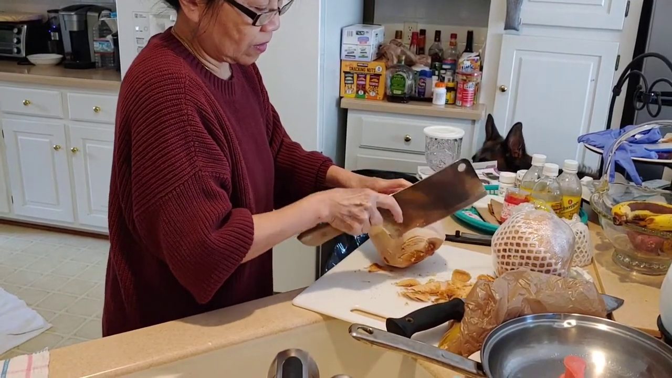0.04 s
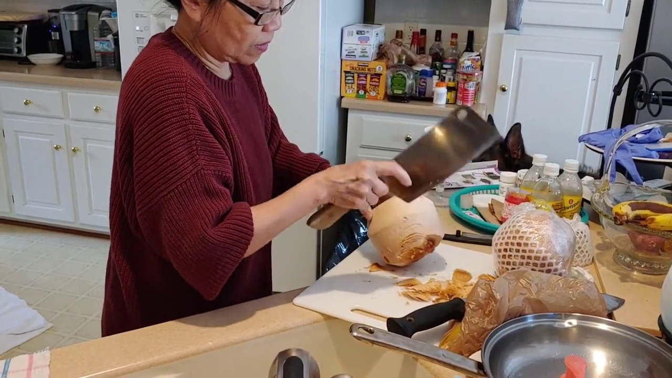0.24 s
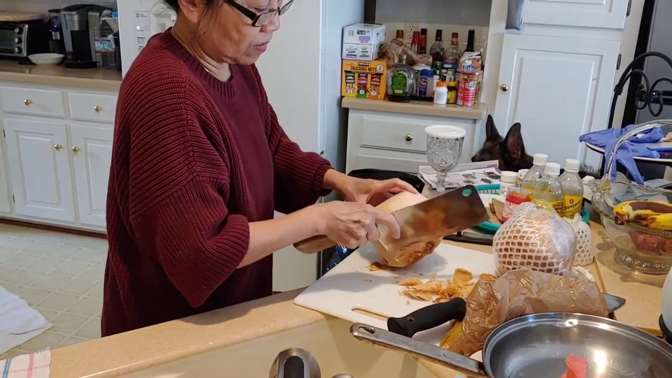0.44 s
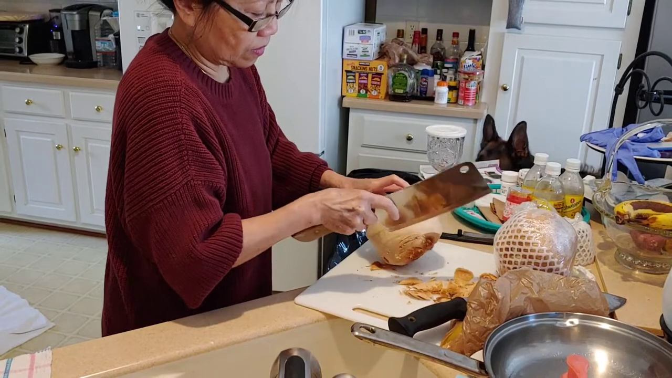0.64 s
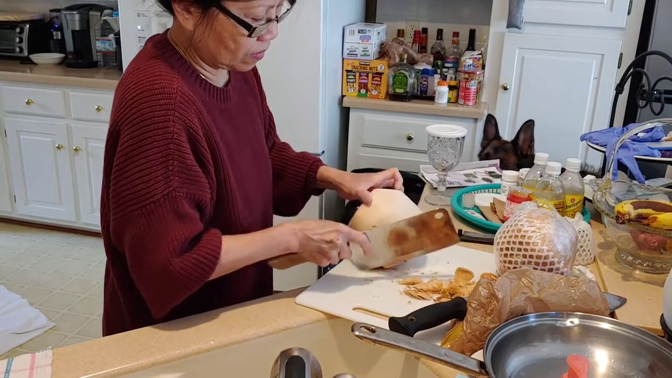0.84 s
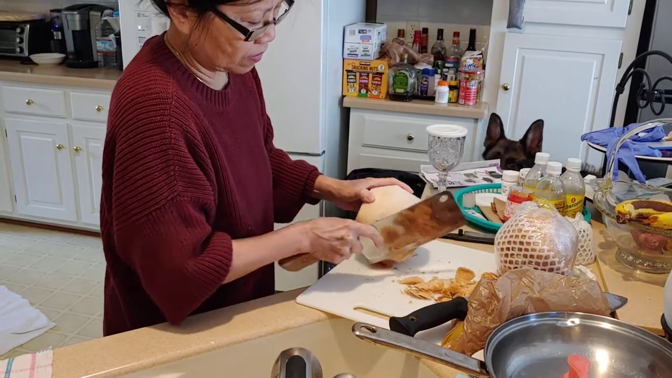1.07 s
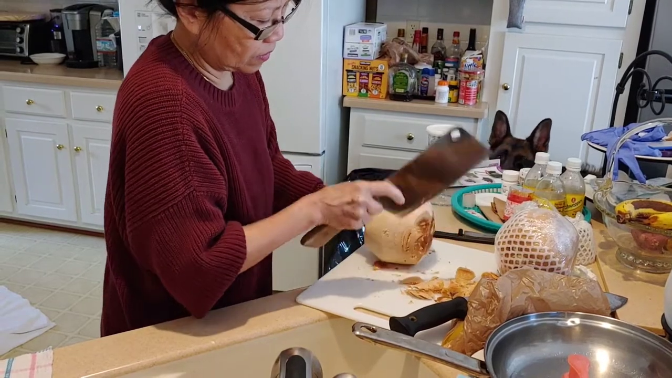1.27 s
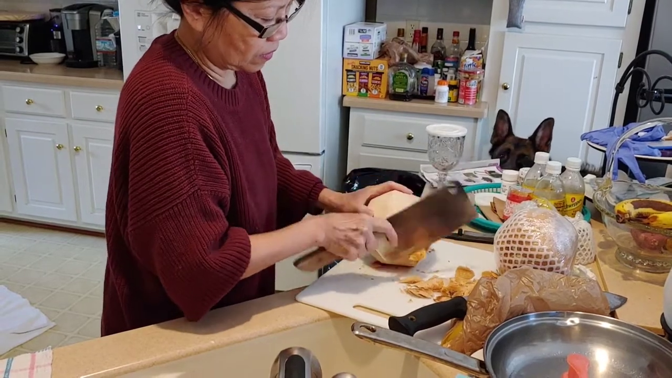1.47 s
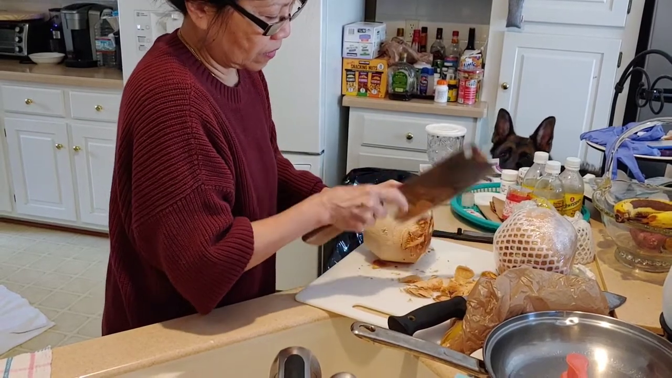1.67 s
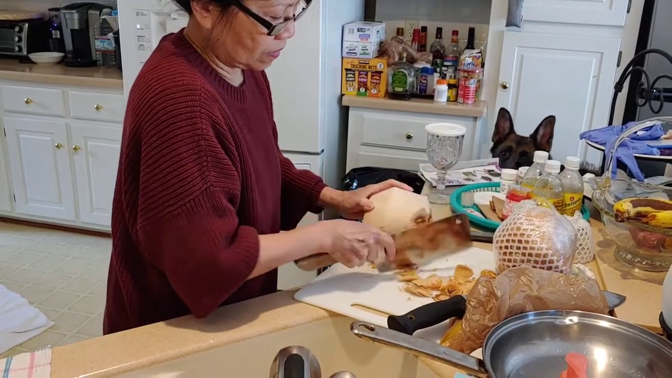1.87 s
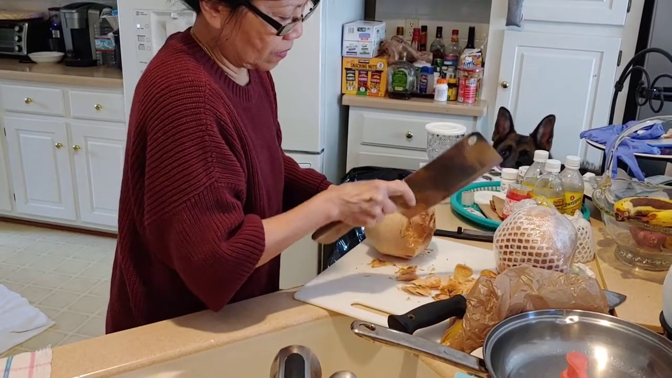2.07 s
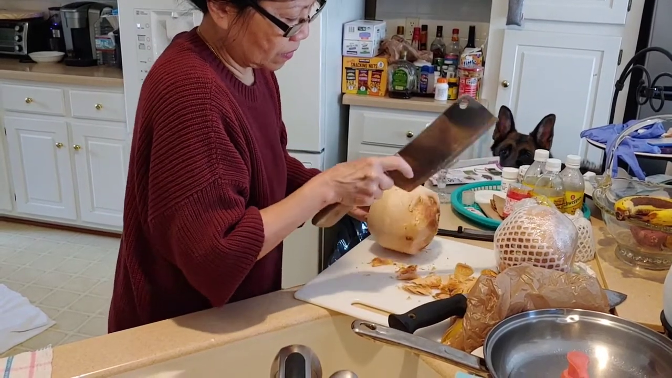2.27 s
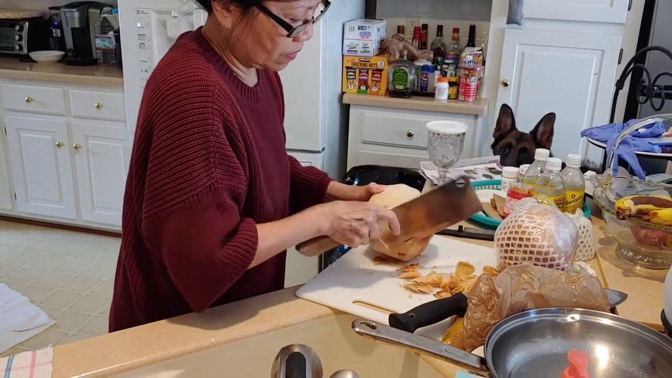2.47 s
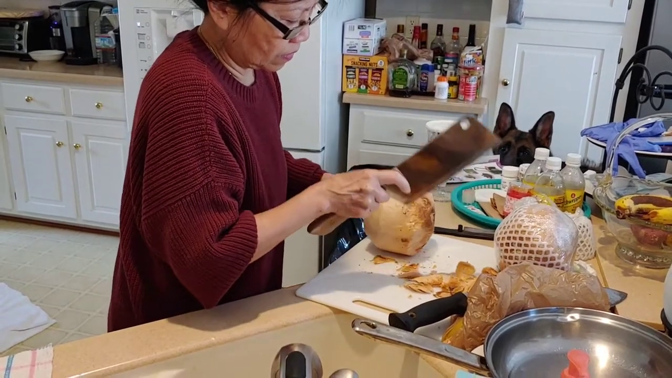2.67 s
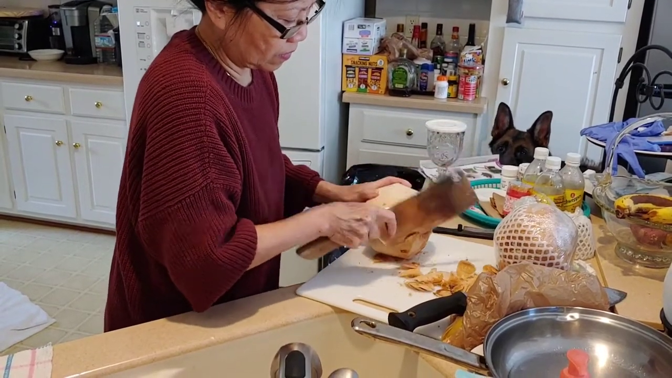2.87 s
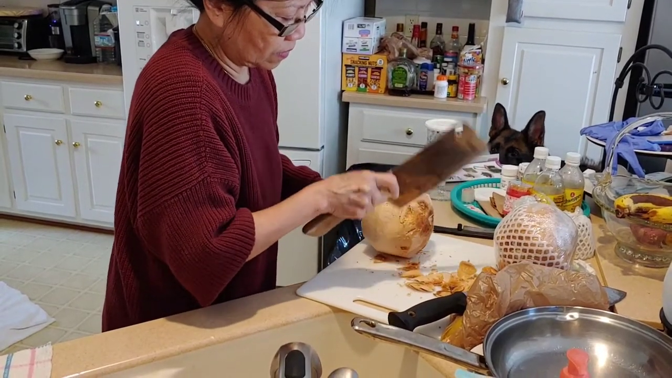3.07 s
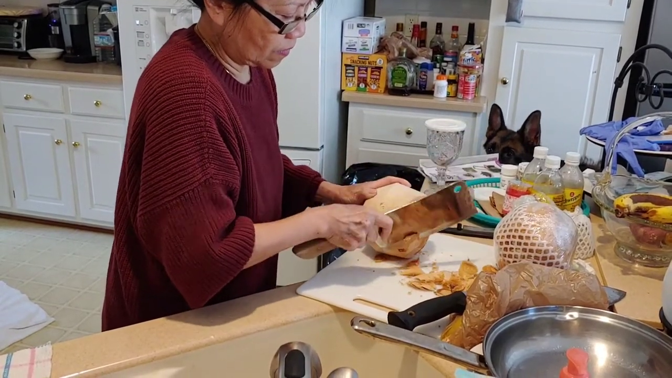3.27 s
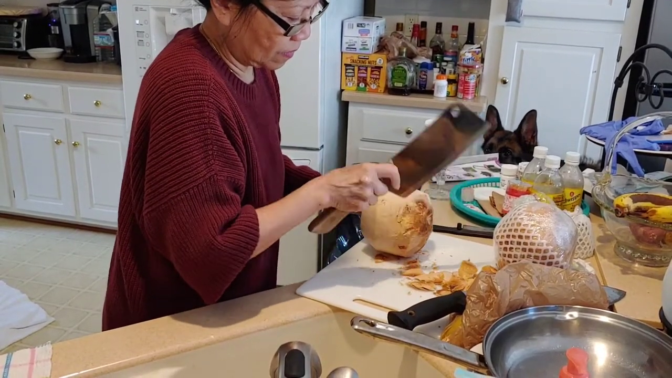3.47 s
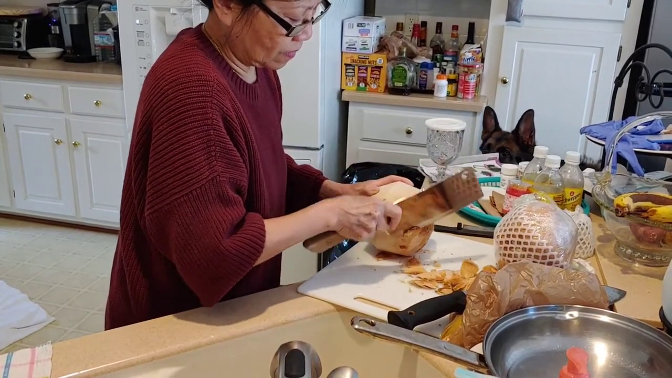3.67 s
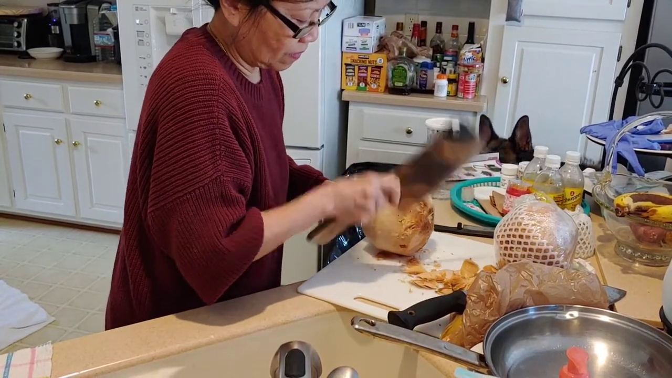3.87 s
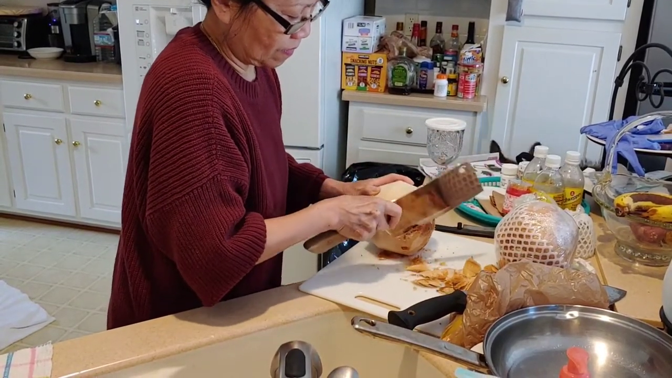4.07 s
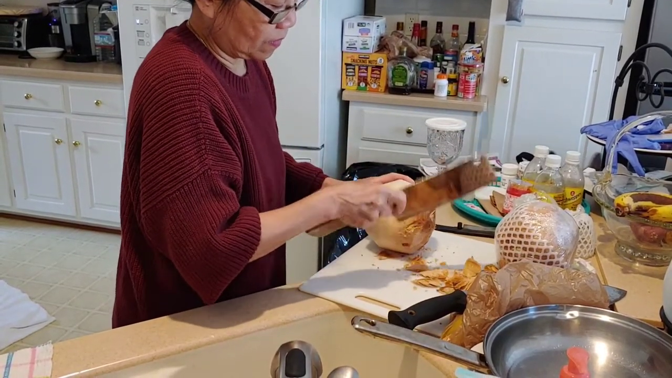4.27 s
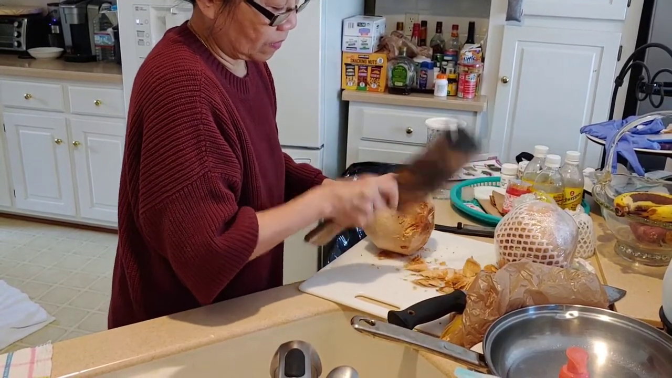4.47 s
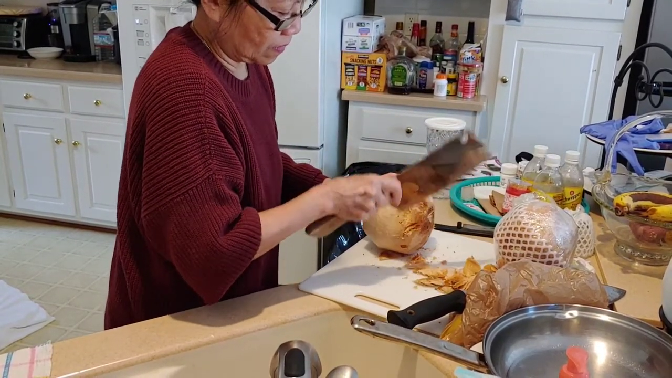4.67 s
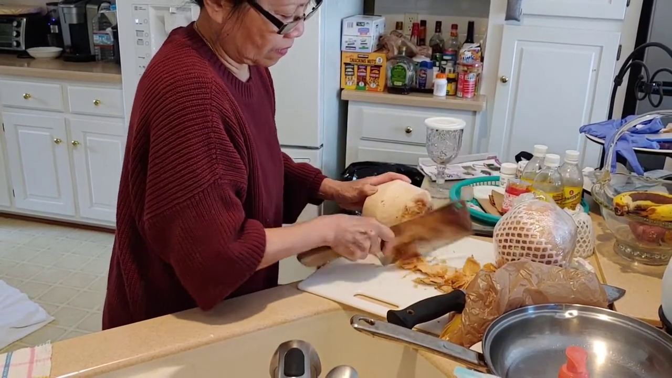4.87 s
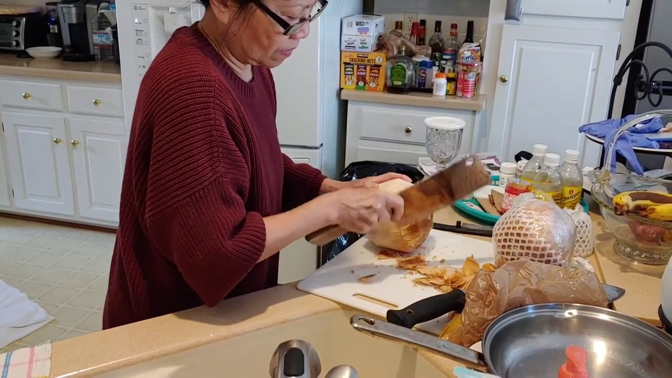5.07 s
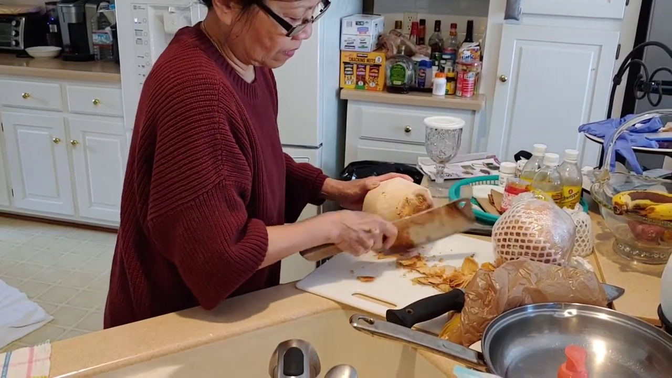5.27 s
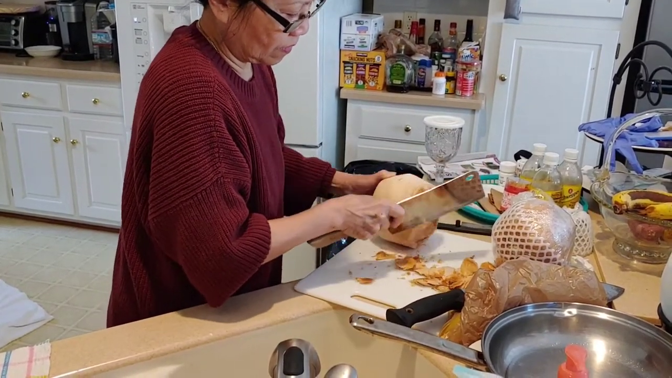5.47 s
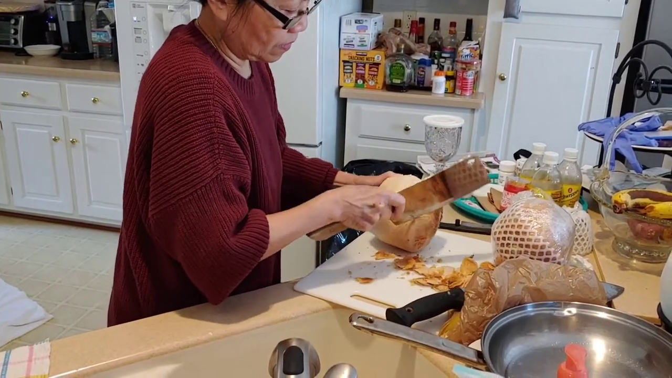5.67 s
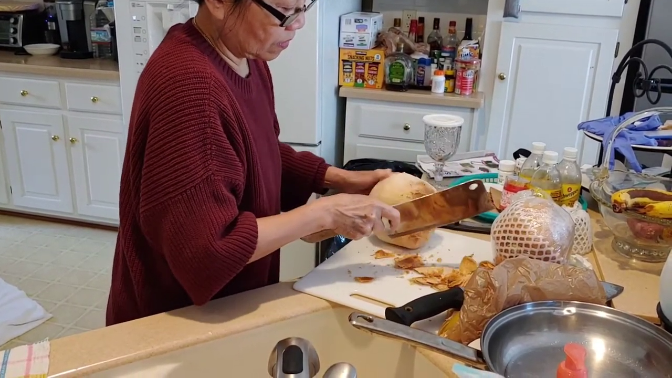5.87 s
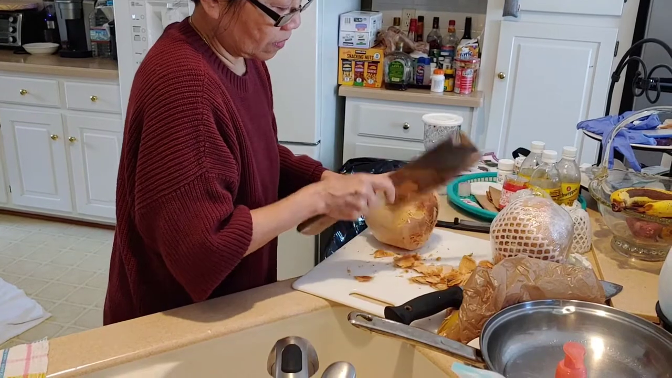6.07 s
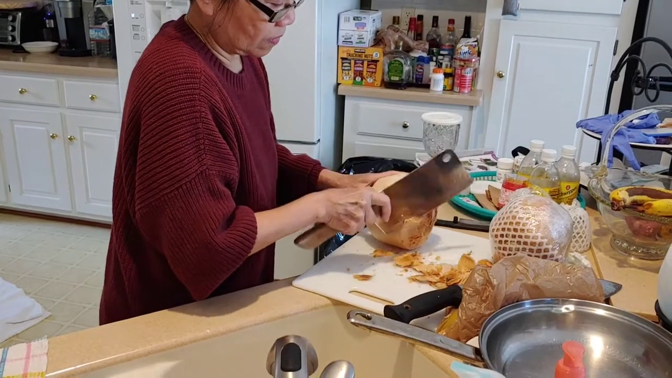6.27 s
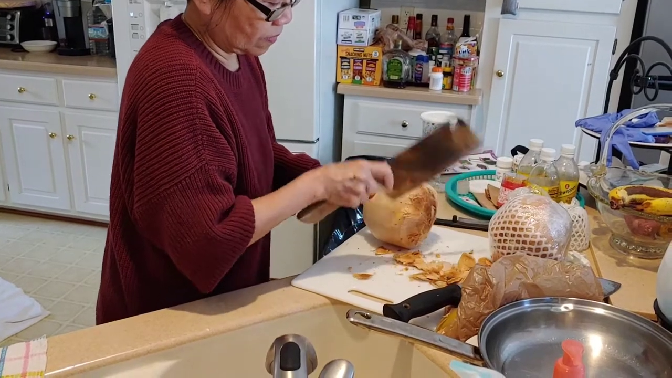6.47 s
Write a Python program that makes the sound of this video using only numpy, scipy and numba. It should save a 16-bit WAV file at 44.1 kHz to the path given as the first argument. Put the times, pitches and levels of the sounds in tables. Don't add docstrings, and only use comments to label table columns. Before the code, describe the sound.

A heavy cleaver hacks at a fibrous coconut on a board, crunching and knocking, with hollow rings and a low fridge hum.

```python
import sys
import numpy as np
from scipy import signal
from scipy.fft import rfft, irfft
from scipy.io import wavfile
from scipy.ndimage import uniform_filter1d
from numba import njit

SR = 44100
rng = np.random.default_rng(int(sys.argv[2]) if len(sys.argv) > 2 else 0)


def natural_amplitude(level_db):
    exponent = np.asarray(level_db, float) / 20
    return 10 ** exponent


def to_wav(s):
    ch = np.atleast_2d(s).T
    pcm = np.round(np.clip(ch, -1, 1) * 32767)
    wavfile.write(sys.argv[1], SR, pcm.astype(np.int16))


N = 287948
LEAD = SR // 10
LENGTH = N + LEAD
BANDS_HZ = 28 * 2 ** np.arange(0, 9.1, .5)

# start in seconds, force in dB, edge in dB (how much the blade bites),
# weight in dB (how much the board takes), depth in dB (how much of that reaches the counter).
CUTS = [(.435, -34, -1, 6, 4.5), (1.476, -30.5, -2, 4.5, -10.5), (1.882, -27, -3.44, 2, -5),
        (2.484, -42.5, 1.5, 7, -12.5), (2.886, -30, -3.5, 1.5, 2), (3.275, -28.5, -2.04, 4.5, 3),
        (3.621, -28, -2.5, 9, -8.5), (3.959, -17.5, -11, 6.5, -10.5), (4.883, -43.5, 11, 24.5, -7.5),
        (5.270, -41, 6.5, 12.5, -8), (6.317, -27.5, 0.66, 3.5, 3.2), (1.279, -49, -2, 35, -10)]
STOPS = [(-.017, -19, 0, 2.5, -1.5), (0.447, -25.5, -11, 3, -11.5), (1.2868, -16, 5, -4.5, -13),
         (1.487, -37.5, -4.5, -6, -11), (1.926, -9, 1.5, -3, -19.5), (2.495, -32.5, -9.5, 4.5, -5),
         (2.898, -31, -20.5, 13, -8), (3.290, -24, -9.5, 4, -7.5), (3.637, -25.5, -8, 4, 0.5),
         (3.965, -14.5, -7.5, 4.5, -14.5), (4.566, -11, -5, 3.5, -12), (4.896, -21.5, 5.5, -8, -11),
         (4.930, -9, -2, -2, -11), (5.296, -6.5, -0.3, -5.5, -6.5), (6.369, -27, 2, 6, -6)]
BOUNCES = [
    (.487, -43, -2.5, 9, -9),
    (1.329, -31, 0.5, 9, -3.5),
    (1.534, -46.5, -18.5, -10, -7.5),
    (2.555, -41.5, -16, 5, 4.5),
    (2.944, -36, -14.5, -7, 16.5),
    (3.316, -38, 8.5, -2, -6),
    (4.011, -45.5, -10, 31.5, -3.2),
    (6.42, -52.5, -8, 25, -22),
]
# start in seconds, force in dB, edge in dB, contact length in ms.
TOUCHES = [(.713, -49, 5.5, 15.3), (.932, -55, -1.8, 13.6), (0.959, -54, -22, 10.6), (1.07, -72, 0, 13),
           (4.24, -45, -12, 12), (4.8, -45.5, -11.5, 16), (5.605, -58, 5.5, 21), (5.74, -59, -2.5, 16),
           (5.87, -55.5, -4, 23.5), (6.028, -50.5, -0.3, 12.7), (6.507, -70.5, 18, 17)]


def contacts():
    contact_ms, sharper_per_edge_db = (8, 3.2, 2.2), (-.02, .022, 0.036)
    push_ms, thud_lag_ms = (3.87, 3.08, 4), (1.52, -0.14, -3.5)
    air, ground = [], []
    for kind, table in enumerate((CUTS, STOPS, BOUNCES)):
        for s, force_db, edge_db, weight_db, depth_db in table:
            shorter = .008 * (force_db + 20) + sharper_per_edge_db[kind] * edge_db
            air.append((s, *airborne(kind, force_db, edge_db), contact_ms[kind] * np.exp(-shorter)))
            board_db = force_db + weight_db
            longer = np.exp(0.022 * (board_db + 19))
            thud_s = s + thud_lag_ms[kind] / 1000
            ground.append((thud_s, board_db, board_db + depth_db, push_ms[kind] * longer))
    for s, force_db, edge_db, ms in TOUCHES:
        air.append((s, *airborne(-1, force_db, edge_db), ms))
    return air, ground


def airborne(kind, force_db, edge_db):
    crunch_db, crunch_per_edge = (1.6, 3.5, 3, 8.3), (0.43, .45, .15, 1.1)
    splinter_db, splinter_per_edge = (-13, -18.5, -13, -18), (1.4, 0.38, 1, 0.52)
    crunch = force_db + crunch_db[kind] + crunch_per_edge[kind] * edge_db
    splinters = force_db + splinter_db[kind] + splinter_per_edge[kind] * edge_db
    return crunch, force_db, force_db + edge_db, splinters


# mode frequency in Hz, level in dB, 60 dB decay time in seconds.
SHELL = [(436, 1, 0.03), (561, -6, 0.052), (623, -0.5, .04), (741, -3.5, 0.083), (868, -2, 0.041),
         (994, -3, 0.079), (1104, -4, 0.075), (1240, -7, 0.012), (1340, -10, 0.07), (1472, -5.5, 0.13)]
HUSK = [(1764, -3, 0.016), (1895, -3.5, 0.017), (2037, -2.5, 0.013), (2470, -9, 0.0077), (2780, -6, 0.0076),
        (3340, -2.5, 0.0029), (3616, -4.5, 0.0091)]
BLADE = [(3830, 0.5, 0.0041), (4955, 2, 0.0051), (5540, -3.5, 0.022), (6535, 6, 0.0053), (6850, -5, 0.0022)]
SPLINTERS = [(8600, -2.5, 0.0046), (9900, -6, 0.00085), (10650, -8, 0.0062)]


def chops():
    direct, spread = np.zeros((2, LENGTH + SR))
    for s, crunch_db, knock_db, blade_db, splinter_db, contact_ms in contacts()[0]:
        knock = strike(SHELL, tearing(0.29 * contact_ms, 3.1), knock_db - 4.5)
        crunch = strike(HUSK, tearing(contact_ms, 2.2), crunch_db - 7.5)
        fizz = strike(BLADE, tearing(contact_ms, 5.6), blade_db - 6)
        fizz = fizz + strike(SPLINTERS, tearing(.6 * contact_ms, 1.6), splinter_db)
        place(direct, s, (knock + crunch + fizz)[0])
        beamed = min(contact_ms / 6, 1)
        into_room = radiated((knock + beamed ** .4 * crunch + beamed ** .6 * fizz)[1])
        late = int(1.2 * contact_ms * SR / 1000) - 128
        place(spread, s, into_room, late)
    return direct[:LENGTH], spread[:LENGTH]


def place(track, s, sound, late=0):
    i = LEAD + int(s * SR) + late
    track[i:i + len(sound)] += sound


def strike(modes, force, db):
    body = ring(modes)
    sound = signal.fftconvolve(force, body)[:SR // 3]
    sound = sound * natural_amplitude(db) / np.sqrt(uniform_filter1d(sound ** 2, SR // 100).max())
    return np.array([sound, body * np.sqrt(np.sum(sound ** 2) / np.sum(body ** 2))])


def ring(modes, scatter_db=3.0, detune=0.014):
    hz, db, t60 = np.transpose(modes)[:, :, None]
    pitch_chance, size_chance = rng.standard_normal((2, len(modes), 1))
    t = np.arange(SR // 3) / SR
    wave = np.sin(2 * np.pi * hz * (1 + detune * pitch_chance) * t)
    fade = np.exp(-np.log(1000) * t / t60)
    sign = (-1) ** np.arange(len(modes))[:, None]
    return np.sum(sign * natural_amplitude(db + scatter_db * size_chance) * fade * wave, axis=0)


def tearing(contact_ms, sparse_db):
    t = 1000 * np.arange(SR // 8) / SR / max(contact_ms, .5)
    snaps = rng.standard_normal(len(t)) * natural_amplitude(sparse_db * rng.exponential(size=len(t)))
    return snaps * np.exp(-t) * (1 - np.exp(-t / 0.65))


def radiated(sound, width=0.17):
    power = np.cumsum(np.abs(rfft(sound)) ** 2)
    bins = np.arange(len(power))
    below, above = bins / (1 + width) - 8, bins * (1 + width) + 8
    smooth = (np.interp(above, bins, power) - np.interp(below, bins, power)) / (above - below)
    return np.roll(irfft(np.sqrt(smooth), len(sound)), 256)[:512] * np.hanning(512)


# mode frequency in Hz, level in dB, 60 dB decay time in seconds.
BOARD = [(120, -4.5, 0.14), (142, 1.5, 0.11), (185, -3, 0.11), (215.2, -4.5, 0.12), (261.6, -2.5, 0.11),
         (332.6, 1.5, 0.084), (380, -7.5, 0.15)]
COUNTER = [(34, -5, 0.12), (51, -6.5, 0.39), (62, -9.5, 0.56), (80.6, -3, 0.19)]
# start in seconds, level in dB, pitch in Hz.
THUMPS = [
    (1.281, -15.5, 125),
    (2.9, -25, 250),
    (3.29, -23.5, 149.5),
    (3.964, -9.5, 155),
    (4.568, -12, 186.6),
]


def thuds():
    boom = np.zeros(LENGTH + SR)
    for s, board_db, counter_db, push_ms in contacts()[1]:
        push = np.hanning(int(max(push_ms, .5) * SR / 1000))
        place(boom, s, strike(BOARD, push, board_db - 3.5)[0])
        place(boom, s, strike(COUNTER, push, counter_db - 4.5)[0])
    for s, db, hz in THUMPS:
        place(boom, s, strike([(hz, 0, 0.053)], np.hanning(SR // 200), db)[0])
    return boom[:LENGTH]


# start in seconds, level in dB.
RINGS = [
    (-.03, -23.5),
    (1.926, -9.5),
    (3.968, -24.5),
    (4.568, -27),
    (4.931, -17),
    (5.296, -16.5),
    (6.369, -31.5),
]
# mode frequency in Hz, level in dB, 60 dB decay time in seconds.
HOLLOW = [(910, -7, 0.098), (940.6, 4, 0.15), (992.7, -2.5, 0.18), (1049, -4.5, 0.19)]
FREED_BLADE = [(1140, -8, 0.038), (1968, -1, .04), (2120, -6, .04), (2250, -1, 0.011), (2625, 0, 0.022),
               (5220, -16, 0.027), (5340, -20, .025), (7200, -28, 0.016)]


def hollow_rings():
    rings = np.zeros(LENGTH + SR)
    for s, db in RINGS:
        place(rings, s, strike(HOLLOW, tearing(4.2, 2.9), db + 0.5)[0])
    place(rings, .713, strike(FREED_BLADE, tearing(8, 3.3), -38)[0])
    return rings[:LENGTH]


# time of the bump in seconds, middle strand in dB, lower strand in dB.
WOBBLES = [(4.05, -41, -27), (4.14, -31, -50), (4.19, -30.5, -47.5), (4.245, -37, -44), (4.295, -32, -32),
           (4.35, -45.5, -35), (4.38, -47.5, -40)]


def rocking():
    start_s, end_s = 4.045, 4.43
    start_hz, wander = (238, 117.6, 438, 680), (0.067, .05, 0.16, 0.15)
    t = (np.arange(LENGTH) - LEAD) / SR
    since = np.maximum(t - start_s, 0)
    sag = 1 - .22 * (1 - np.exp(-since / .13))
    s, *peaks_db = np.transpose(WOBBLES)[:, :, None]
    bump_fade_db = 229 * np.abs(t - s)
    levels_db = [np.max(db - bump_fade_db, axis=0) for db in peaks_db]
    levels_db += [db - 34 * since for db in (-49, -53)]
    drone = 0
    for hz, share, db in zip(start_hz, wander, levels_db):
        tone = np.sin(2 * np.pi * np.cumsum(hz * sag * (1 + share * walk(51))) / SR)
        drone = drone + tone * natural_amplitude(db + 2.5 + 3.3 * walk(40))
    return (since > 0) * (t < end_s) * drone


# frequency in Hz, 60 dB decay time in seconds, level in dB.
ROOM = [(58.7, 0.94, -10), (258, 0.31, 4), (1030, 0.52, -0.5), (3000, 0.4, -1), (6800, 0.35, -4.5),
        (11000, 0.22, 1.5)]


def kitchen(direct, spread):
    t = np.arange(SR) / SR
    tail = 0
    for hz in BANDS_HZ:
        fade = np.exp(-np.log(1000) * t / on_log(ROOM, hz)) * (1 - np.exp(-t / 0.00044))
        fade = fade / np.sqrt(np.sum(fade ** 2))
        tail = tail + pair(SR, hz) * natural_amplitude(on_log(ROOM, hz, column=2)) * fade
    ports = np.array([np.roll(direct, 1), direct])
    return natural_amplitude(-3) * ports + signal.fftconvolve(spread[None], tail, axes=1)[:, :LENGTH]


# frequency in Hz, rms level in dB.
HUM = [(59.2, -52), (118.4, -59), (242.2, -59)]
# frequency in Hz, level in dB per Hz.
AIR = [(25, -12), (55, -8), (190, -23.5), (600, -27.5), (1500, -33), (2800, -41), (6500, -48.5),
       (8500, -55.5)]
# frequency in Hz, width in octaves, height in dB.
CABINET = [(249.4, 0.35, 11.5), (2050, 0.21, 8.5)]


def fridge():
    lines = 0
    for hz, db in HUM:
        level = np.sqrt(2) * natural_amplitude(db + 3.1 * walk(14))
        lines = lines + level * np.sin(2 * np.pi * np.cumsum(hz + 1.7 * walk(9)) / SR)
    swell_db = walk(3)
    hiss = 0
    for hz in BANDS_HZ:
        colour_db = on_log(AIR, hz)
        for hump_hz, octaves, db in CABINET:
            colour_db += db * np.exp(-(np.log2(hz / hump_hz) / octaves) ** 2)
        hiss = hiss + pair(LENGTH, hz) * natural_amplitude(colour_db + swell_db + 0.91 * walk(37))
    return lines + unit(hiss) * natural_amplitude(-52.5)


# frequency in Hz, likeness from 0 to 1.
LIKENESS = [(100, .95), (250, .88), (500, .72), (1000, 0.2), (3000, 0), (6000, 0), (12000, 0.1)]


def pair(size, hz):
    like = np.clip(on_log(LIKENESS, hz), -.99, .99)
    mid, side = band(rng.standard_normal((2, size)), hz)
    opposite = np.array([[1], [-1]])
    return mid * np.sqrt((1 + like) / 2) + opposite * side * np.sqrt((1 - like) / 2)


def band(x, hz):
    octaves = np.log2(np.maximum(np.fft.rfftfreq(x.shape[-1], 1 / SR), 1) / hz)
    return irfft(rfft(x) * np.cos(np.pi * np.clip(octaves, -.5, .5)), x.shape[-1])


def walk(rate):
    k = int(SR / rate)
    held = np.repeat(rng.standard_normal(LENGTH // k + 1), k)
    return uniform_filter1d(held, k)[:LENGTH]


def on_log(table, hz, column=1):
    table = np.array(table)
    return np.interp(np.log(np.maximum(hz, 1)), np.log(table[:, 0]), table[:, column])


def unit(x):
    return x / np.sqrt(np.mean(x ** 2))


# frequency in Hz, left minus right in dB.
LEAN = [(100, 2), (300, 1), (600, 0.5), (1000, -4.5), (2500, 1.5), (5000, 7), (8000, 2), (12000, -0.5)]


def scene():
    direct, spread = chops()
    boom, rings, drone = thuds(), hollow_rings(), rocking()
    direct = direct + boom + rings + drone
    spread = spread + natural_amplitude(-16) * rings + natural_amplitude(-3.5) * boom + natural_amplitude(-5.5) * drone
    sound = kitchen(direct, spread) + fridge()
    lean = natural_amplitude(on_log(LEAN, np.fft.rfftfreq(LENGTH, 1 / SR)) / 2)
    return irfft(rfft(sound) * np.array([lean, 1 / lean]), LENGTH)[:, LEAD:]


@njit
def follow(x, attack, release):
    y, e = np.empty(len(x)), 0.
    for i in range(len(x)):
        e += (x[i] - e) * (attack if x[i] > e else release)
        y[i] = e
    return y


def low_pass(x):
    return signal.sosfilt(signal.butter(12, 13020, fs=SR, output="sos"), x)


def record(dry):
    attack_s, release_s = 0.017, .35
    envelope = follow(np.abs(dry).max(axis=0), 1 / (attack_s * SR), 1 / (release_s * SR))
    ducked = dry * np.maximum(envelope / natural_amplitude(-25.0), 1) ** -.2 * natural_amplitude(4)
    top_cut = signal.ellip(10, .5, 45, 12150, fs=SR, output="sos")
    dull = signal.sosfilt(top_cut, ducked)
    spikes = natural_amplitude(-17.5) * (ducked - dull) * np.clip(np.abs(ducked) / .5, 0, 1)
    rounded = np.tanh(1.08 * (dull + spikes)) / 0.97
    return low_pass(np.clip(rounded, -1, 1))


dry = scene()
out = record(dry)
to_wav(out)
```